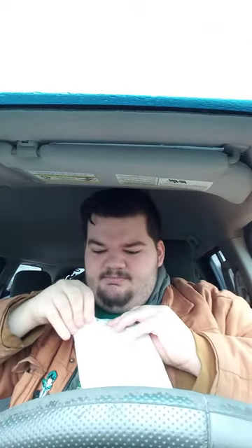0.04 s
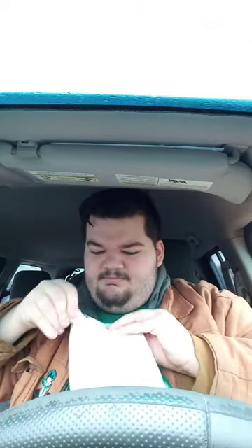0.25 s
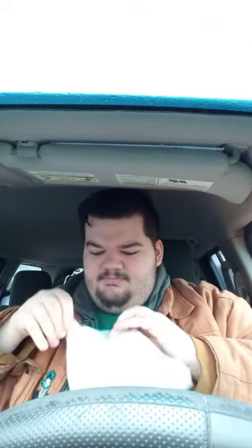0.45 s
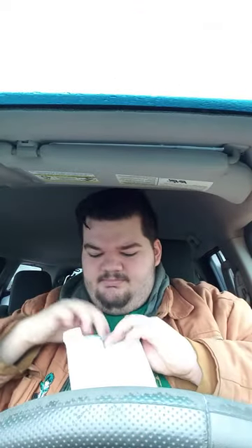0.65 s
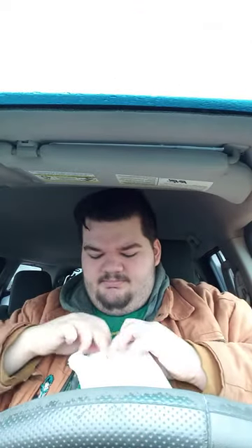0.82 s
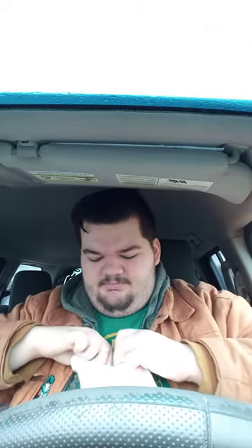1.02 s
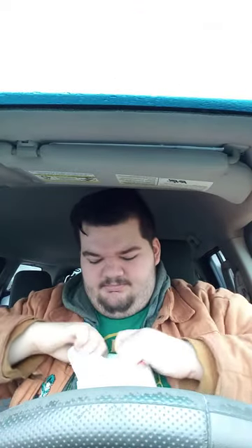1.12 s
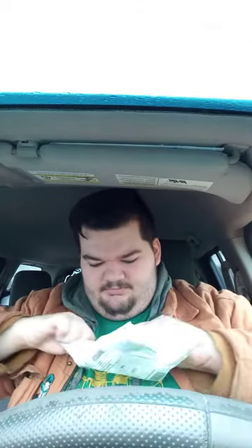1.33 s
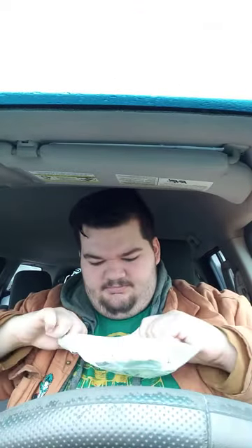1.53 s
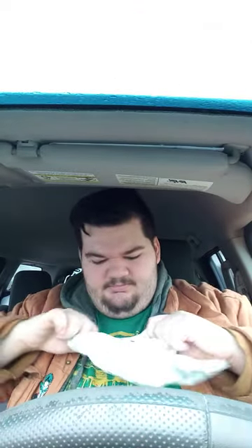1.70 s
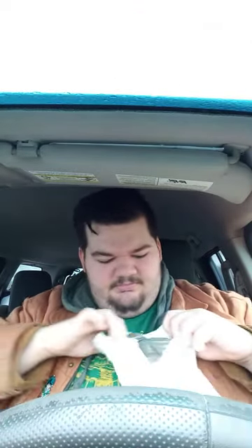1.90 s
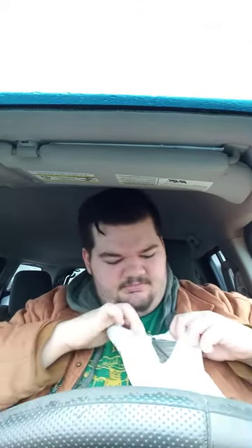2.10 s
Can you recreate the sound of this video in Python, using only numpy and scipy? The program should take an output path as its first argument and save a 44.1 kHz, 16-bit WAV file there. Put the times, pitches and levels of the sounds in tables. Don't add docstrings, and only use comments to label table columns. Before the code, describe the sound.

Crisp paper tearing and crumpling by two hands, near the microphone in a small padded car cabin. An early rip bursts out, sparse ticks follow, then dense creases and fluttering sheet over a faint low hush.

```python
import sys
import numpy as np
from scipy import signal
from scipy.fft import rfft, irfft
from scipy.io import wavfile

SR = 44100
rng = np.random.default_rng(int(sys.argv[2]) if len(sys.argv) > 2 else 0)


def master_out(mix):
    frames = np.transpose(np.atleast_2d(mix))
    ceiling = np.clip(frames, -1, 1)
    pcm = np.round(ceiling * 32767).astype(np.int16)
    wavfile.write(sys.argv[1], SR, pcm)


def ratio(d):
    e = np.asarray(d, float) / 20
    return 10 ** e


N = 94815

# frequency [Hz], level [dB per Hz].
QUIET_COLOUR = [
    (25, -23),
    (60, -12.5),
    (240, 2),
    (810, -28.5),
    (1900, -26),
    (4000, -29),
    (10000, -26),
    (16000, -36),
]
# frequency [Hz], level [dB per Hz].
PAPER_COLOUR = [
    (300, -19),
    (700, -13.5),
    (1500, -5),
    (5500, 5),
    (9000, -8),
    (10200, -17),
    (13000, -8),
    (16000, -7.5),
]
# frequency [Hz], width [Hz], lift [dB].
CABIN_RESONANCES = [(686.5, 117, -13), (867, 37, 3.5), (1500, 144, 9.5), (2120, 44, 0), (2590, 46, 3.5),
                    (3714, 290, 2.5), (5400, 170, -1), (1282, 278, -7.5), (2660, 160, 1)]
# frequency [Hz], time to fall 60 dB [s].
CABIN_DECAY = [
    (300, 0.092),
    (800, 0.067),
    (2000, 0.059),
    (14000, 0.036),
]
# time [s], level [dB], share of low rustle [dB].
HAND_EFFORT = [(0, -53, 5), (0.174, -52.5, -4), (0.255, -25, -3), (0.345, -59.5, -0.5), (0.547, -55, -8),
               (0.603, -40, 0), (.71, -51.5, 12.5), (0.727, -52, 6), (0.81, -40, 0.5), (0.86, -63, 6),
               (0.928, -34, -5), (1.0, -43.5, 0), (1.13, -34, -0.5), (1.584, -36.5, -3), (1.648, -60, 3),
               (1.72, -44, -3), (2.03, -50, 0), (2.15, -49, 6.5)]
# start [s], peak [dB], pitch [Hz].
SHEET_FLAPS = [(0.028, -48, 487), (0.067, -42, 474), (0.125, -49, 310), (0.126, -37.5, 1120),
               (0.174, -50, 360), (0.2302, -21, 400), (0.229, -40.5, 135), (0.232, -23, 826),
               (0.236, -30.5, 310), (0.28, -48.5, 148), (0.63, -51, 130), (1.136, -48, 119),
               (1.49, -52, 121), (0.002, -55, 99), (0.273, -40.5, 300), (0.275, -31, 980),
               (0.447, -50.5, 357), (0.597, -30, 950), (0.597, -44, 245), (0.683, -34.5, 352),
               (0.747, -42, 485), (0.925, -45.5, 367), (1.023, -46, 552), (1.053, -32, 890),
               (1.055, -43, 470), (1.113, -47, 336), (1.118, -38, 880), (1.14, -40.5, 477),
               (1.202, -35, 1050), (1.204, -37, 410), (1.319, -45.5, 252), (1.375, -44, 880),
               (1.417, -30.5, 860), (1.417, -38.5, 375), (1.462, -44.5, 318), (1.5, -39.5, 477),
               (1.57, -47, 350), (2.075, -54, 476), (2.099, -55, 170), (2.13, -53.5, 255)]
# start [s], peak [dB], panel pitch [Hz], bright fizz [dB below peak].
TEAR_SNAPS = [(0.0004, -25, 1780, -3.5), (0.0179, -29, 2800, -8), (0.0419, -31, 3860, -7.5),
              (0.0683, -33, 2350, -12), (0.1027, -35.5, 2230, -3.5), (0.1156, -30, 4070, -6.5),
              (0.1286, -26, 4000, -12.5), (0.1842, -26, 1470, -17), (0.198, -33.5, 5370, -0.5),
              (0.2198, -21, 3960, -12), (0.2288, -12.5, 4640, -17), (0.2331, -10.5, 2220, -21),
              (0.249, -6, 4900, -18), (0.2534, -10.5, 1820, -18), (0.2762, -19.5, 2730, -12),
              (0.309, -24.5, 6600, -19)]
# start [s], peak [dB], panel pitch [Hz], bright fizz [dB below peak].
PAUSE_TICKS = [(0.3282, -36, 4970, -19), (0.3703, -36, 7000, -12), (0.3863, -37.5, 2830, -23),
               (0.414, -42, 4000, -35), (0.4213, -26, 2690, -44), (0.4401, -25, 5700, -29),
               (0.492, -28, 6400, -30), (0.502, -54, 5800, -29), (0.529, -61, 6000, -19),
               (0.5532, -37.5, 4260, -14), (0.5643, -40, 5300, -21), (0.5828, -25, 5400, -28)]
# start [s],
# peak [dB], panel pitch [Hz], bright fizz [dB below peak].
HANDLING_SNAPS = [(0.588, -27.5, 1510, -8.5), (0.627, -20.5, 4000, -20), (0.6335, -23, 3270, -15),
                  (0.6441, -24, 5400, -10), (0.6635, -39, 1780, 0), (0.6874, -22, 1500, -41),
                  (0.7002, -28, 1670, -23), (0.7422, -28, 3770, -15.5), (0.7622, -20.5, 4300, -16.5),
                  (0.7724, -22, 3570, -23.5), (0.8152, -39, 2320, -10), (0.8668, -28, 6750, -8.5),
                  (0.903, -32, 2560, -30), (0.929, -21.5, 4660, -13), (0.9382, -19, 6400, -20),
                  (0.97, -24, 3650, -16), (0.991, -31, 2800, -34), (1.025, -28.5, 1490, -11),
                  (1.042, -19.5, 3000, -16.5), (1.0559, -18, 1300, -22), (1.1003, -42, 2500, -30),
                  (1.1158, -15.5, 3350, -25), (1.1217, -17.5, 1580, -38), (1.1456, -19.5, 1700, -38),
                  (1.1604, -14, 1740, -38), (1.1726, -28.5, 5300, 0.5), (1.186, -19.5, 4840, -22),
                  (1.2034, -18, 1650, -37), (1.2136, -18.5, 1600, -17), (1.2336, -20.5, 2350, -26),
                  (1.2623, -18, 2080, -14), (1.279, -22.5, 2810, -37), (1.298, -32, 3950, -32),
                 (1.3477, -16.5, 2750, -24), (1.3628, -16, 2970, -20), (1.3764, -15, 2800, -15),
                 (1.3929, -21, 4180, -17), (1.4177, -20, 2600, -19), (1.4332, -21.5, 5300, -7.5),
                 (1.4687, -23, 3990, -13), (1.5013, -17.5, 2700, -14.5), (1.5161, -15, 5400, -20.5),
                 (1.5748, -29, 1600, -33), (1.6127, -22.5, 6700, -21), (1.6586, -33.5, 6400, -5.5),
                  (1.6908, -24.5, 1630, -27), (1.7098, -18.5, 2770, -19), (1.75, -30, 5800, -32),
                  (1.7586, -24, 2590, -23), (1.799, -28.5, 2350, -20), (1.8266, -31.5, 1520, -11),
                  (1.8383, -27.5, 2830, -9.5), (1.8659, -28, 2920, -12), (1.886, -22, 1630, -22),
                  (1.925, -30, 3830, -20), (1.935, -22, 3300, -10), (1.979, -30.5, 1910, -28),
                  (2.045, -36, 4260, -21), (2.0583, -30, 1590, -20), (2.1019, -24, 2340, -23),
                  (2.1265, -28, 1440, -19),
                  (0.291, -39, 3000, -34), (0.517, -36, 1370, -43), (0.611, -33, 2740, -17),
                (0.801, -37, 4000, -25), (0.842, -42, 1350, -42), (0.9219, -27.5, 1620, -34),
                (0.948, -51, 2500, -24), (1.2453, -20.5, 3720, -17), (1.3144, -28, 2520, -18),
                (1.3275, -19.5, 3970, -27), (1.345, -28, 2500, -28), (1.43, -24, 2980, -17),
                (1.461, -29, 1550, -22), (1.531, -28, 5550, -4), (1.5422, -28, 2580, -15),
                (1.565, -28, 3000, -25), (1.682, -46, 7000, 0), (1.734, -55, 5800, -22),
                (1.7752, -32, 5830, -17), (2.054, -32.5, 3550, -40), (1.876, -28, 1980, -20),
                (1.891, -27, 1960, -25)]

SPAN = 8192
SPOTS = 24
PANEL_FLOOR = 0.48
RUSTLE_LOW_HZ, RUSTLE_HZ = 176, 1050


def rms_one(x):
    return x / np.sqrt(np.mean(x ** 2) + 1e-20)


def peak_one(x):
    return x / np.abs(x).max(axis=-1, keepdims=True)


def filtered(x, order, hz, kind):
    return signal.sosfilt(signal.butter(order, hz, kind, fs=SR, output="sos"), x)


def at_hz(points, hz):
    table_hz, value = np.array(points).T
    return np.interp(np.log(hz + 1), np.log(table_hz), value)


def causal(db):
    cepstrum = irfft(db * np.log(10) / 20)
    cepstrum[1:SPAN // 2] *= 2
    cepstrum[SPAN // 2 + 1:] = 0
    return irfft(np.exp(rfft(cepstrum)))[:SPAN // 2]


def ring(x, hz, cycles):
    r = ratio(-60 * hz / (cycles * SR))
    w = 2 * np.pi * min(hz, 0.45 * SR) / SR
    return signal.lfilter([0, np.sin(w)], [1, -2 * r * np.cos(w), r * r], x + 1e-18)


def burst(rise_s, t60_s, size):
    t = np.arange(size) / SR
    return (1 - np.exp(-t / rise_s)) ** 2 * ratio(-60 * t / t60_s)


def quiet():
    hz = np.arange(SPAN // 2 + 1) * SR / SPAN
    hush = signal.fftconvolve(rng.standard_normal(N + SPAN), causal(at_hz(QUIET_COLOUR, hz)))
    return ratio(-72) * rms_one(hush[SPAN:SPAN + N])


def cabin():
    hz = np.arange(SPAN // 2 + 1) * SR / SPAN
    t = np.arange(SPAN) / SR
    colour_db = at_hz(PAPER_COLOUR, hz)
    for f, width, lift in CABIN_RESONANCES:
        colour_db = colour_db + lift * np.exp(-((hz - f) / width) ** 2)
    white = rng.standard_normal((SPOTS, SPAN))
    tail = np.zeros((SPOTS, SPAN))
    for lo in 50 * 2. ** np.arange(9):
        band = filtered(white, 2, [lo, min(2 * lo, 20000)], "band")
        tail += band * ratio(-60 * t / at_hz(CABIN_DECAY, 1.4 * lo))
    reflections_db = -3.5
    energy = np.sum(tail ** 2, axis=1, keepdims=True)
    tail = ratio(reflections_db) * tail * (t > 0.001) / np.sqrt(energy)
    tail[:, 0] = 1
    return signal.fftconvolve(tail, [causal(colour_db)], axes=1)[:, :SPAN]


def crackle(room):
    crackles_per_s, clumps_per_s, crackle_t60_s = 1000, 50, 0.0085
    s, effort_db, low_db = np.transpose(HAND_EFFORT)
    t = np.arange(N) / SR
    effort = ratio(np.interp(t, s, effort_db))
    low_share_db = np.interp(t, s, low_db)

    r = np.exp(-2 * np.pi * clumps_per_s / SR)
    wander = signal.lfilter([1], [1, -2 * r, r * r], rng.standard_normal(N + 4000))[4000:]
    clump = ratio(2.72 * rms_one(wander))
    sizes = ratio(3.8 * np.minimum(rng.exponential(1, N), 2.62))
    pops = sizes * (rng.random(N) < crackles_per_s / SR) + 1e-18

    dealt = rng.integers(0, SPOTS, N) == np.arange(SPOTS)[:, None]
    each = signal.lfilter([1], [1, -ratio(-60 / (crackle_t60_s * SR))], pops * dealt)
    each = clump * (ratio(6) * rms_one(each) + 1) * rng.standard_normal((SPOTS, N))

    pitches = np.geomspace(1200, 16000, SPOTS)
    grains = np.array([filtered(ring(x, hz, cycles=3.1), 2, PANEL_FLOOR * hz, "high") * hz ** 0.28
                       for x, hz in zip(each, pitches)])
    grains /= np.std(signal.fftconvolve(grains, room, axes=1).sum(0))
    grains[pitches < 2500] *= ratio(low_share_db)

    rustle = filtered(each, 2, [RUSTLE_LOW_HZ, RUSTLE_HZ], "band")
    rustle *= ratio(low_share_db - 4.5) / np.std(signal.fftconvolve(rustle, room, axes=1).sum(0))
    return signal.fftconvolve(effort * (grains + rustle), room, axes=1).sum(0)[:N]


def flaps(room):
    flap_cycles, rise_s, push = 4.6, 0.0018, 0.72
    out = np.zeros(N + SPAN)
    for k, (s, db, hz) in enumerate(SHEET_FLAPS):
        air = (rng.standard_normal(2048) + push) * burst(rise_s, flap_cycles / hz, size=2048)
        puff = filtered(ring(air, hz, flap_cycles), 2, RUSTLE_HZ, "low")
        puff = filtered(puff, 3, 0.64 * hz, "high")
        i = int(s * SR)
        heard = signal.fftconvolve(puff, room[k % SPOTS])[:SPAN]
        out[i:i + SPAN] += ratio(db + 3.5) * peak_one(heard)
    return out[:N]


def snaps(room):
    snap_t60_s, sudden_s, peel_s = 0.016, 0.0001, 0.00078
    panel_cycles, panel_db = 2.27, -2.5
    fizz_hz, fizz_lift_db = 7960, 6.5
    deeper_per_db, small_snap_db, deepest_hz = 3.4, -24, 1070
    sudden = TEAR_SNAPS + PAUSE_TICKS
    rows = sudden + HANDLING_SNAPS
    out = np.zeros(N + SPAN)
    for k, row in enumerate(rows):
        s, db, hz, fizz_db = row
        fibres = rng.standard_normal((2, 1024))
        rise_s = sudden_s if row in sudden else peel_s
        crease, bright = fibres * burst(rise_s, snap_t60_s, size=1024)
        floor_hz = PANEL_FLOOR * hz * ratio(deeper_per_db * min(small_snap_db - db, 0))
        crease = filtered(crease, 3, max(floor_hz, deepest_hz), "high")
        panel = ring(crease, hz, panel_cycles)
        body = rms_one(crease) + ratio(panel_db) * rms_one(panel)
        body = filtered(body, 4, fizz_hz, "low")
        if row in PAUSE_TICKS:
            tick = rms_one(fibres[0] * burst(sudden_s, snap_t60_s, size=1024))
            body = filtered(tick + body, 8, 2350, "high")
        fizz = filtered(bright, 4, fizz_hz, "high")
        heard = signal.fftconvolve([body, fizz], [room[k % SPOTS]], axes=1)[:, :SPAN]
        body, fizz = peak_one(heard)
        i = int(s * SR)
        out[i:i + SPAN] += ratio(db) * (body + ratio(fizz_db + fizz_lift_db) * fizz)
    return out[:N]


def scene():
    room = cabin()
    return (crackle(room) + flaps(room) + snaps(room))[None]


def low_pass(x):
    return signal.sosfilt(signal.butter(12, 17020, fs=SR, output="sos"), x)


def record(dry):
    mic = filtered(dry, 3, 118, "high") + quiet()
    top_cut = signal.cheby2(24, 60, 15980, fs=SR, output="sos")
    mix = signal.sosfilt(top_cut, mic)
    return low_pass(mix)


dry = scene()
out = record(dry)
master_out(out)
```